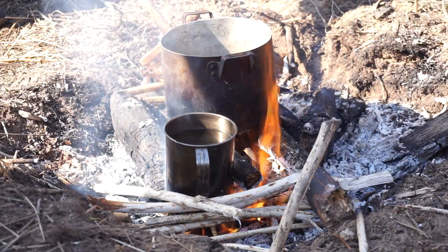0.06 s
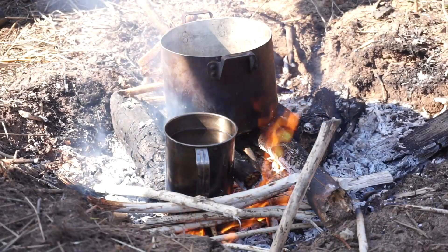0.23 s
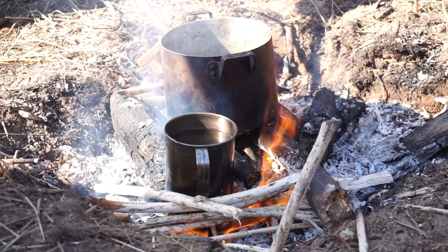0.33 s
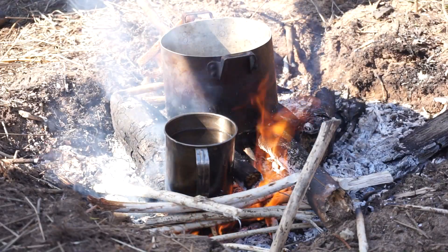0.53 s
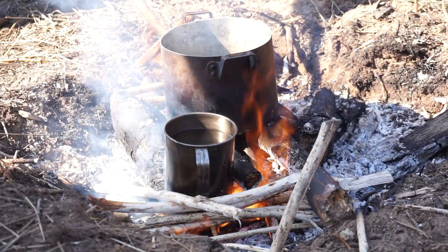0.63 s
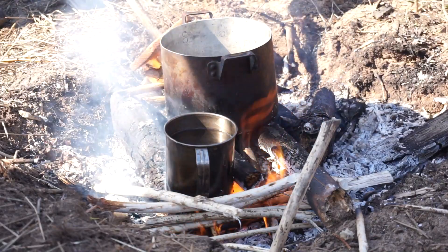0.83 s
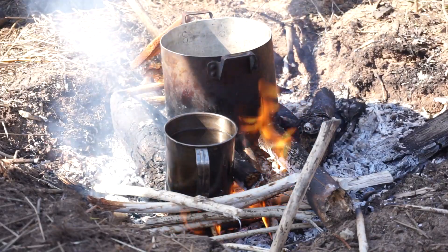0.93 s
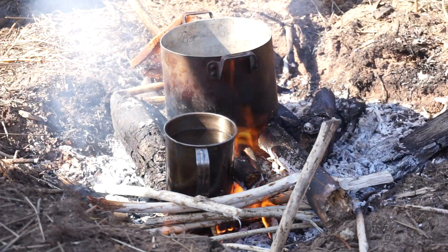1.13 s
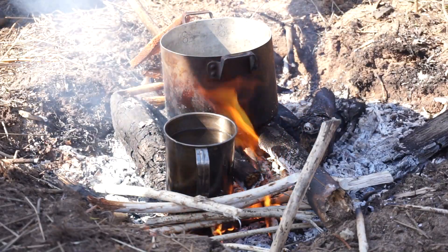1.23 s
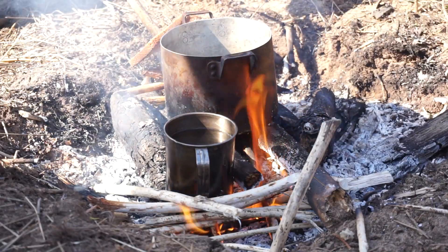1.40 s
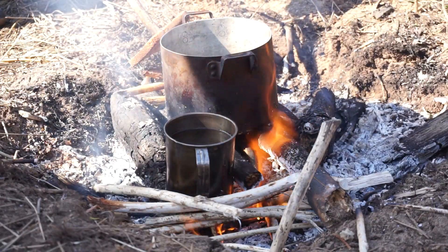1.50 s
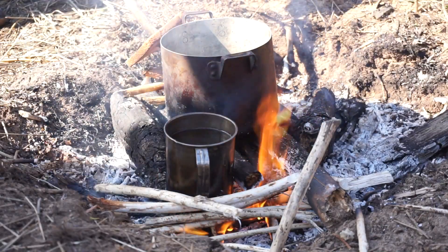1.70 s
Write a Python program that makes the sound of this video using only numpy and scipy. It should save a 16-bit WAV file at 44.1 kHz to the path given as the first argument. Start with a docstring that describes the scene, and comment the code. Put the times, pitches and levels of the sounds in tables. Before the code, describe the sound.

Small campfire crackling outdoors, sharp dry wood snaps close by over faint hiss and fizz

```python
"""Dry snaps of bursting wood cells come first, bright and close, each bouncing once off the ground.
A small fire burns outdoors under a pot, close to a two-port microphone: dull knocks of shifting
wood and fine crackle are short bursts and clicks, boiling sap fizzes in two bands of noise, steam
whistles faintly as wavering sines, and simmering water hums as clicks ring two modes of the pot.
Flames flutter low in decaying sine puffs over shaped noise, the soft open-air hiss."""
import sys
import numpy as np
from scipy import signal
from scipy.fft import rfft, irfft
from scipy.io import wavfile
from scipy.ndimage import uniform_filter1d

SR = 44100
rng = np.random.default_rng(int(sys.argv[2]) if len(sys.argv) > 2 else 0)


def persist_wave(psi):
    """Save psi, clipped to +-1, as 16-bit WAV."""
    counts = np.round(np.clip(psi, -1, 1) * 32767).astype(np.int16)
    wavfile.write(sys.argv[1], SR, np.atleast_2d(counts).T)


def how_loud(loudness_db):
    """Turn decibels into a plain amplitude multiplier (0 dB gives 1, 20 dB gives 10)."""
    steps = np.asarray(loudness_db, float) / 20
    return 10 ** steps


N = 77175  # samples, 1.75 s


def curve(table, column):
    """One column of a table, drawn in straight lines over its times to every sample."""
    rows = np.array(table, float)
    return np.interp(np.arange(N) / SR, rows[:, 0], rows[:, column])


def band(x, low_hz, high_hz):
    """Butterworth band-pass."""
    edges = [low_hz, min(high_hz, 0.47 * SR)]
    return signal.sosfilt(signal.butter(2, edges, "bandpass", fs=SR, output="sos"), x)


def unit(x):
    """Scale to an rms of 1."""
    return x / np.sqrt(np.mean(x ** 2))


def walk(rate):
    """Random levels, rate of them a second, smoothed twice and scaled to an rms of 1."""
    hold = int(SR / rate)
    steps = np.repeat(rng.standard_normal(N // hold + 1), hold)
    return unit(uniform_filter1d(uniform_filter1d(steps, hold), hold)[:N])


def grains(per_s, spread_db):
    """Random clicks whose sizes have a long tail."""
    hits = rng.random(N) < per_s / SR
    size = rng.standard_normal(N)
    return hits * size * how_loud(spread_db * np.minimum(rng.exponential(size=N), 5))


# How alike the two ports hear a spread-out source.
# Each row: frequency in Hz, left-right correlation.
PORT_LIKENESS = [(60, 0.51), (130, 0.97), (290, 0.36), (640, 0.055), (1410, -0.55), (3100, -0.15),
                 (6820, 0.08), (15000, 0.43)]


def ports(mid, side):
    """Turns mid and side into left and right; the side's share sets the likeness at each frequency."""
    hz = np.fft.rfftfreq(N, 1 / SR) + 1
    points = np.array(PORT_LIKENESS)
    likeness = np.interp(np.log(hz), np.log(points[:, 0]), points[:, 1])
    likeness = np.clip(likeness, -0.95, 0.95)
    side = irfft(rfft(side) * np.sqrt((1 - likeness) / (1 + likeness)), N)
    return np.array([mid + side, mid - side])


def add(out, sound, start_s, pan_db):
    """Places a short sound in the stereo pair; pan_db is left over right."""
    i = max(int(start_s * SR), 0)
    k = min(sound.shape[-1], N - i)
    out[:, i:i + k] += sound[..., :k] * how_loud(np.array([[pan_db], [-pan_db]]) / 2)


# Colour of the open-air hiss around the microphone.
# Each row: frequency in Hz, relative spectral level in dB.
AIR_COLOUR = [(15, -43), (25, -15.5), (92, -7.5), (177, -2.5), (349, -5.5), (422, -5), (510, -1.5),
              (617, -2.5), (1010, -5), (2530, -4.5), (5570, -5.5), (6040, -3), (12900, -5), (15200, -11.5),
              (16500, -3)]
# Draught over the microphone, heard as bass flutter.
# Each row: time in seconds, bass gain in dB before the random flicker.
BASS_DRAUGHT = [(0, -2), (.1, 2), (.15, 7.5), (.4, 7.5), (.52, 5.5), (.57, -7), (.7, -8), (.74, 4.5),
                (.95, -6.5), (1.05, 3.5), (1.2, -11.5), (1.25, 4.5), (1.4, 2), (1.6, 3.5), (1.66, -13),
                (1.75, -4)]


def air():
    """Open-air hiss as noise shaped in frequency; its bass flutters with the draught."""
    level_db, bass_hz, flicker_db = -57.5, 210, 2.5
    hz = np.fft.rfftfreq(N, 1 / SR) + 1
    points = np.array(AIR_COLOUR)
    colour = how_loud(np.interp(np.log(hz), np.log(points[:, 0]), points[:, 1]))
    hiss = [unit(irfft(rfft(rng.standard_normal(N)) * colour, N)) for _ in range(2)]
    hiss = np.array(hiss) * how_loud(level_db)
    bass = signal.sosfiltfilt(signal.butter(2, bass_hz, fs=SR, output="sos"), hiss)
    bass_gain = how_loud(curve(BASS_DRAUGHT, 1) + flicker_db * walk(25.1))
    return ports(*(hiss + bass * (bass_gain - 1)))


# Puffs of the flame, low and centred in front of the microphone.
# Each row: start in seconds, envelope peak in dB, frequency in Hz.
FLAME_PUFFS = [(0.131, -66, 107), (0.228, -68, 181), (0.297, -64.5, 117), (0.369, -63, 102),
               (0.717, -60.5, 197), (0.789, -68.5, 258), (0.861, -62, 184), (1.034, -76, 177),
               (1.229, -71, 175), (1.325, -63.5, 78.1), (1.415, -62.5, 91.5)]


def flames():
    """Soft low puffs: sines of random phase that swell smoothly and die away exponentially."""
    rise_s, fall_s = 0.0074, 0.01
    out, t = np.zeros((2, N)), np.arange(5000) / SR
    env = (1 - np.exp(-(t / rise_s) ** 2)) * np.exp(-t / fall_s)
    env = env / env.max()
    for start_s, peak_db, hz in FLAME_PUFFS:
        tone = np.sin(2 * np.pi * hz * t + 2 * np.pi * rng.random())
        add(out, how_loud(peak_db) * env * tone, start_s, 0)
    return out


# Hum of the pot over the fire.
# Each row: time in seconds, level of the lower mode in dB rms, alike in mid and side before the ports.
POT_HUM = [(0.0, -70), (0.2, -65), (0.34, -69), (0.632, -76), (0.78, -76.5), (0.88, -73), (1.0, -72.5),
           (1.07, -67.5), (1.2, -77), (1.35, -69), (1.5, -69), (1.646, -70.5), (1.75, -75.5)]


def pot():
    """Small bubbles of simmering water knock two narrow modes of the pot."""
    lower_hz, upper_hz, width_hz, upper_db = 623.5, 675, 35, -8

    def ring(clicks, hz):
        return unit(signal.lfilter(*signal.iirpeak(hz, hz / width_hz, SR), clicks))

    pair = []
    for _ in range(2):
        bubbles = grains(per_s=220, spread_db=1.14)
        # reversed in time, the same clicks knock the upper mode at other moments
        hum = ring(bubbles, lower_hz) + how_loud(upper_db) * ring(bubbles[::-1], upper_hz)
        pair.append(how_loud(curve(POT_HUM, 1)) * hum)
    return ports(*pair)


# Faint whistles of steam from the wood, one list of rows for each.
# Each row: time in seconds, frequency in Hz before the wobble, level in dB rms before flicker and pan.
STEAM_WHISTLES = [
    [(.21, 2180, -68), (.25, 2170, -69), (.29, 2060, -72), (.34, 2190, -67), (.38, 2180, -68),
     (.43, 2130, -73), (.5, 2200, -70), (.53, 2200, -84)],
    [(.94, 1930, -82), (.96, 1932, -67), (1.03, 1920, -71), (1.088, 1935, -62), (1.097, 1930, -82),
     (1.14, 1945, -76), (1.16, 1945, -66), (1.2, 1900, -71), (1.25, 1870, -72), (1.34, 1860, -78),
     (1.42, 1910, -82), (1.47, 1920, -75), (1.49, 1920, -84)],
    [(1.46, 2540, -82), (1.5, 2540, -74), (1.56, 2540, -82), (1.62, 2550, -74), (1.69, 2530, -82),
     (1.75, 2560, -70)],
]


def whistles():
    """Steam whistles: thin sines with random wobble of pitch and flicker of level."""
    wobble_hz, flicker_db, port_lag_rad = 18, 4, 0.45
    t = np.arange(N) / SR
    out = 0
    for rows, pan_db in zip(STEAM_WHISTLES, (1.5, -1.5, 0)):
        on = (t > rows[0][0]) & (t < rows[-1][0])
        phase = 2 * np.pi * np.cumsum(curve(rows, 1) + wobble_hz * walk(150)) / SR
        gain = on * np.sqrt(2) * how_loud(curve(rows, 2) + flicker_db * walk(50.02))
        left = how_loud(pan_db / 2) * np.sin(phase)
        right = how_loud(-pan_db / 2) * np.sin(phase + port_lag_rad)
        out = out + gain * np.array([left, right])
    return out


# Fizz of sap in the burning wood, levels alike in mid and side before the ports.
# Each row: time in seconds, level of the 8.5-17.5 kHz band in dB rms, level of the 3-8 kHz band in dB rms.
SAP_FIZZ = [(0, -56.5, -74), (.06, -56.5, -63.5), (.17, -61.5, -76), (.3, -55, -69.5), (.38, -52, -57),
            (.388, -41, -51), (.41, -50, -59.5), (.425, -59.5, -61.5), (.5, -47, -58), (.56, -62.5, -78),
            (.7, -53.5, -60), (.95, -64.5, -80), (1.15, -62, -65), (1.3, -65.5, -86), (1.45, -60.5, -82),
            (1.495, -56, -73.5), (1.52, -57, -72), (1.57, -50.5, -66), (1.63, -54, -60), (1.68, -57.5, -71),
            (1.75, -57, -64)]


def fizz():
    """Dense tiny bursts of boiling sap over their own hiss, in two bands that flicker together."""
    flicker_db, bursts_db = 2, -4  # bursts_db: bursts over the hiss
    flicker = how_loud(flicker_db * walk(60.1))
    pair = []
    for _ in range(2):
        bursts = unit(grains(per_s=2500, spread_db=3)) * how_loud(bursts_db)
        sap = (bursts + rng.standard_normal(N)) * flicker
        high = unit(band(sap, 8500, 17500)) * how_loud(curve(SAP_FIZZ, 1))
        low = unit(band(sap, 3000, 8000)) * how_loud(curve(SAP_FIZZ, 2))
        pair.append(high + low)
    return ports(*pair)


def crackle():
    """Small random crackle: sparse clicks in the treble that wander between the ports."""
    click_db, pan_db = -51, 1.9  # click_db: before the band-pass
    small = band(grains(per_s=80, spread_db=1.2), 8000, 15000) * how_loud(click_db)
    return small * how_loud(np.outer([1, -1], pan_db * walk(40.5)))


# Dull knocks of shifting wood in the fire.
# Each row: start in seconds, envelope peak in dB before the pan, frequency in Hz, pan in dB left over right.
WOOD_KNOCKS = [(.028, -52, 750, 5), (.39, -54, 420, 0), (.4365, -48, 1000, 5), (.6295, -54, 620, 3),
               (.99, -53, 1100, 0), (1.229, -50, 2300, 0)]


def knocks():
    """Shifting wood knocks dully: a sine that swells and dies within a few cycles."""
    peak_cycles = 0.6  # the envelope peaks here
    out, t = np.zeros((2, N)), np.arange(800) / SR
    for start_s, peak_db, hz, pan_db in WOOD_KNOCKS:
        x = t * hz / peak_cycles
        env = np.e * x * np.exp(-x)
        add(out, how_loud(peak_db) * env * np.sin(2 * np.pi * hz * t), start_s, pan_db)
    return out


# Modes of the logs that every snap rings.
# Each row: frequency in Hz, sharpness Q, gain in dB.
LOG_RINGS = [(670, 3.5, -2), (1680, 8, -7), (2170, 8, -3), (3010, 10, -8), (4320, 9, -7), (5150, 10, -6),
             (7180, 10, -5)]
SNAP_LEAD = 128  # samples in a snap ahead of its burst


def snap(level_db, ring_hz, high_db, mid_db):
    """A click with bright splinters rings the logs, bounces off the ground and scatters."""
    burst_s, splinter_db, side_db = 0.0002, -9, -14
    bounce_s, bounce_db = 0.00155, -16
    tail_s, tail_db = 0.0015, -21
    t = np.arange(1024) / SR
    chance = rng.standard_normal((4, len(t)))
    side = np.array([[1], [how_loud(side_db)]])  # rows are mid and side
    burst = how_loud(splinter_db) * np.diff(chance[:2] * np.exp(-t / burst_s), prepend=0) * side
    burst[:, 0] += [1, how_loud(side_db) * chance[1, -1]]
    k = int(bounce_s * SR)
    burst[:, k:] += how_loud(bounce_db) * burst[:, :-k]
    burst += how_loud(tail_db) * chance[2:] * np.exp(-t / tail_s) * side

    hz = np.fft.rfftfreq(len(t), 1 / SR) + 1

    def mode(centre_hz, q):
        return 1 / (1 + 2j * q * (hz / centre_hz - 1))

    logs = sum(how_loud(gain_db) * mode(centre_hz, q) for centre_hz, q, gain_db in LOG_RINGS)
    ring = 0.12 + mode(ring_hz, 6) + logs
    spectrum = rfft(np.roll(burst, SNAP_LEAD, axis=1))

    # four bands, each set by the peak of its mid envelope
    above = [1 / (1 + (edge_hz / hz) ** 6) for edge_hz in (400, 1400, 3500, 9500, 17000)]
    y = 0
    for i, gain_db in enumerate((mid_db - 10, mid_db, high_db, 0)):
        part = irfft(spectrum * (above[i] - above[i + 1]) * ring, len(t))
        y = y + how_loud(gain_db) * part / np.abs(signal.hilbert(part[0])).max()
    return how_loud(level_db) * np.array([y[0] + y[1], y[0] - y[1]])


# Snaps of bursting wood cells, close to the microphone.
# Each row: time of the burst in seconds, mid peak of the 9.5-17 kHz band in dB before the pan, ring in Hz,
# level of 3.5-9.5 kHz in dB and of 1.4-3.5 kHz in dB (both relative to that peak), pan in dB left over right.
WOOD_SNAPS = [(0.0224, -41, 14600, -8, -13, -4), (0.0255, -40, 15100, -15, -11, -8),
              (0.0364, -29.5, 9900, -7.5, -24, -5), (0.2056, -21, 15000, -3, -10.5, -3.5),
              (0.359, -35, 12500, -11, -25, 6), (0.362, -35, 15300, -8, -33, -6),
              (0.3637, -15, 14300, -12, -23.5, 2.5), (0.3873, -30, 12500, -10, -16, 0),
              (0.39, -21.5, 12600, -2.5, -17.5, -3), (0.396, -30, 12000, -12, -28, 8),
              (0.4033, -38, 12800, -10, -24, 6), (0.4046, -27, 12000, -10, -18, 4),
              (0.4896, -40.5, 11600, -11, -5, 11), (0.5186, -4.5, 15500, -12, -25.5, 0.5),
              (0.522, -29, 14700, -11, -20, -11), (0.5234, -20.5, 11600, -9, -25.5, 10),
              (0.5254, -29, 14900, -14, -20, 6), (0.5454, -34.5, 14800, -28, -22, 10),
              (0.5998, -34.5, 11100, -5.5, -17.5, 13), (0.6256, -40.5, 14500, -14, -12, 3),
              (0.6297, -21.5, 15000, -17.5, -21, 11), (0.6537, -35, 14800, -17, -24, 6),
              (0.6825, -41, 11600, -5, -21, 6), (0.736, -41, 12600, -7, -20, -3),
              (0.7924, -31, 10800, -10, -21, 2), (0.8256, -34.5, 13300, -17, -23, 3),
              (0.8289, -32, 13800, -13, -35, 2), (0.8842, -36, 14300, -10, -18, -1),
              (0.9132, -41.5, 11100, -10, -24, 3), (1.0254, -34.5, 15000, -12.5, -23, -3),
              (1.0833, -32, 12400, -11, -27, 0), (1.2242, -38, 13500, -19, -24, -2),
              (1.2282, -36, 10500, -16, -21, 0), (1.231, -40, 11700, -15, -15, 0),
              (1.237, -31.5, 10400, -17, -17, 4), (1.2397, -42, 14700, -12, -11, -6),
              (1.3287, -18, 12650, -27, -37, -3), (1.4361, -39.5, 12600, -17, -20, -1),
              (1.503, -38, 14700, -10, -18, 0), (1.5416, -39.5, 8400, -9, -27, 4),
              (1.5463, -40, 11500, -11, -26, 2), (1.5678, -37.5, 10600, -9, -35, 8),
              (1.6636, -39.5, 11300, -7, -23, -3), (1.6815, -42, 13100, -9, -20, 4)]


def snaps():
    """Wood cells burst one by one, each a dry snap with its own ring and place."""
    out = np.zeros((2, N))
    for burst_s, level_db, ring_hz, high_db, mid_db, pan_db in WOOD_SNAPS:
        sound = snap(level_db, ring_hz, high_db, mid_db)
        add(out, sound, burst_s - SNAP_LEAD / SR, pan_db)
    return out


def scene():
    """All sources at the two ports, from the background to the snaps."""
    return air() + flames() + pot() + whistles() + fizz() + crackle() + knocks() + snaps()


def low_pass(x):
    """Removes everything above the highest recorded frequency."""
    return signal.sosfilt(signal.butter(12, 17490, fs=SR, output="sos"), x)


def record(dry):
    """The recorder drops the top steeply: two elliptic low-passes, each run forwards and backwards."""
    shelf = signal.ellip(5, 0.1, 15, 16000, fs=SR, output="sos")
    end = signal.ellip(6, 0.1, 35, 17400, fs=SR, output="sos")
    mix = signal.sosfiltfilt(shelf, dry)
    mix = signal.sosfiltfilt(end, mix)
    return low_pass(mix)


dry = scene()
out = record(dry)
persist_wave(out)
```